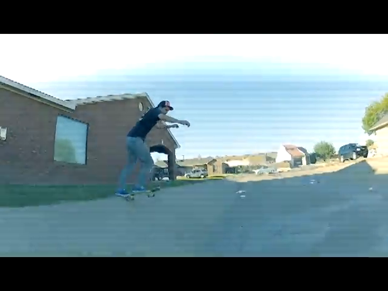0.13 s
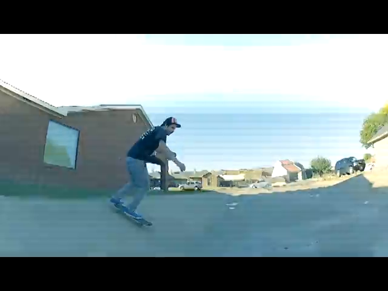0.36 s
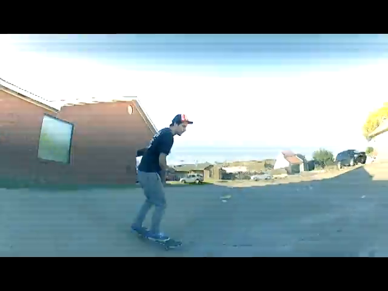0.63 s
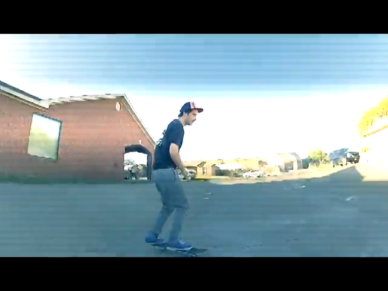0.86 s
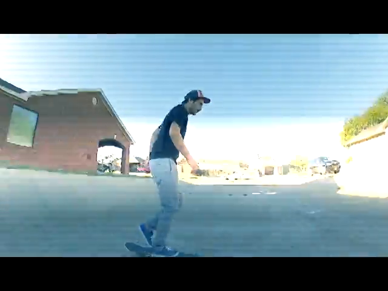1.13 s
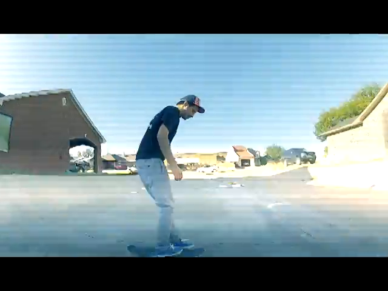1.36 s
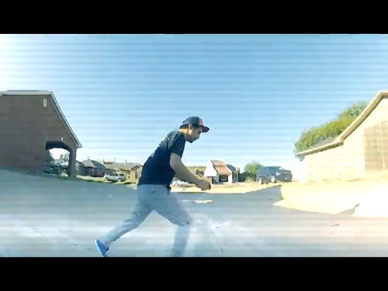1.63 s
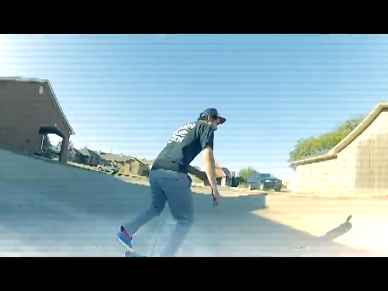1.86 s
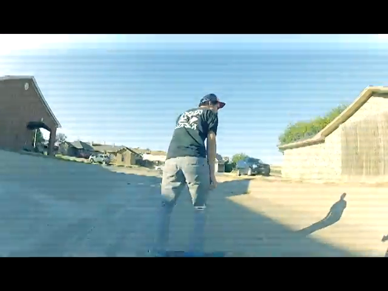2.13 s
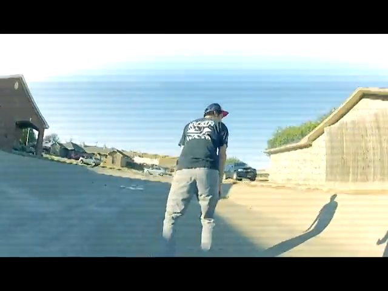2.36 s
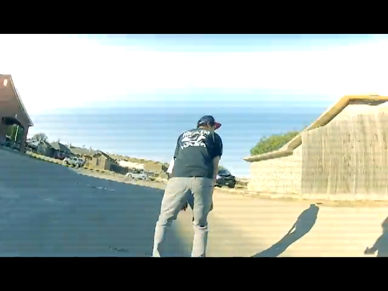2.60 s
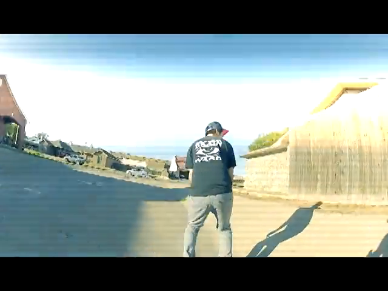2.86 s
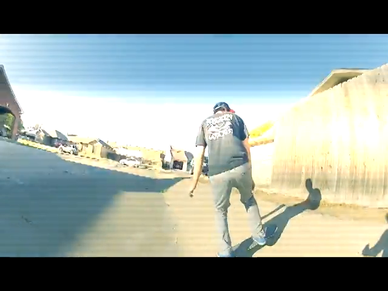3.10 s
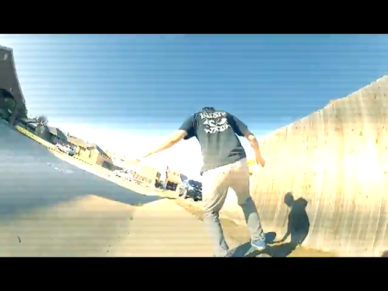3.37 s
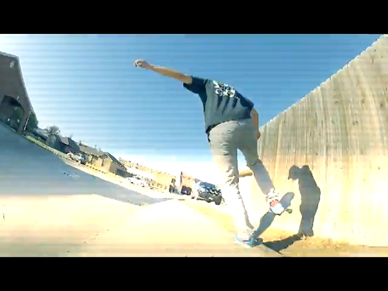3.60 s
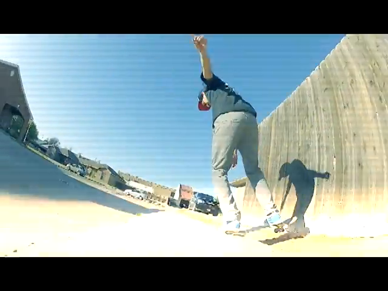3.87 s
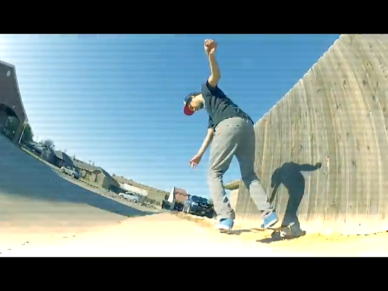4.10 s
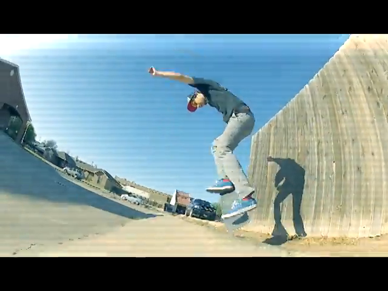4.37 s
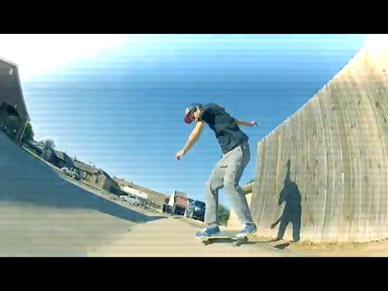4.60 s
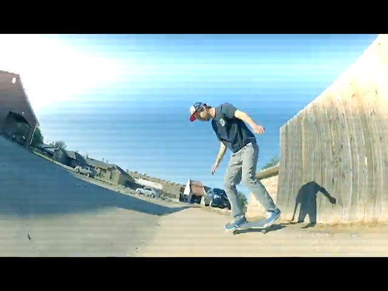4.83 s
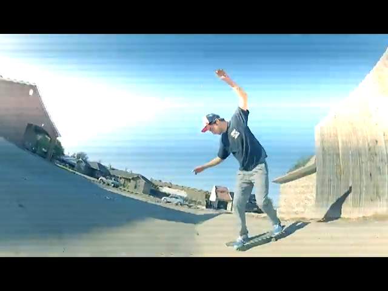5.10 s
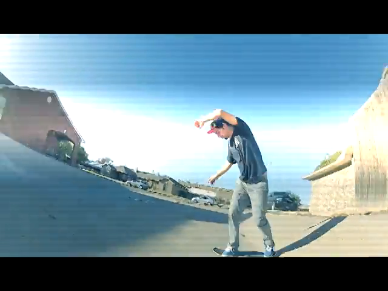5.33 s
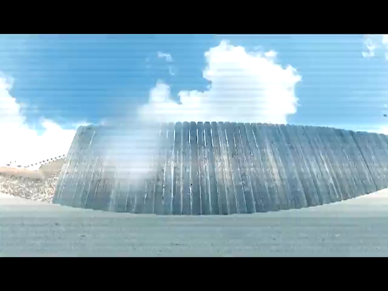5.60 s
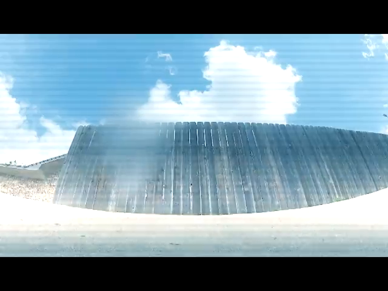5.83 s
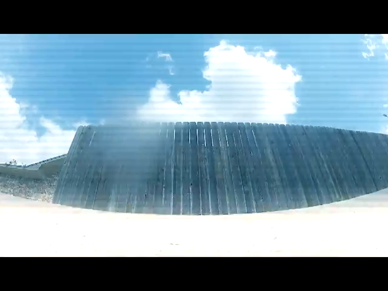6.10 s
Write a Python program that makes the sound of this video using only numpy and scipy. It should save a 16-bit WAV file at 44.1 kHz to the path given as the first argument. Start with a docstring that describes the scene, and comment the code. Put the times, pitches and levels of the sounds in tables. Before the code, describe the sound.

Gritty skateboard rolling heard close from a following board, broken by wooden knocks, scrapes and slams, ending in near quiet.

```python
"""A skateboard on rough concrete, heard from a second board that follows: it pops, scrapes and lands. Stones
shake the ground, deck, wheels and grit, each a bank of resonances driven by random bumps. Blows, ticks, tail
scrapes and a ringing truck are shaped noise or bumps; landings push the microphone. From 5.645 s the bass thins
to a rising drone, with faint narrow bands above it. The sound is held in 12 kHz steps, which mirrors it around
6 and 12 kHz, and the hardest landing clips."""
import sys
import numpy as np
from scipy import signal
from scipy.io import wavfile
from scipy.ndimage import uniform_filter1d

SR = 44100
rng = np.random.default_rng(int(sys.argv[2]) if len(sys.argv) > 2 else 0)


def boost(x):
    """Linear amplitude factor 10**(x/20) for a level x in decibels (scalar or array-like)."""
    u = np.asarray(x, float) / 20
    return 10 ** u


def generate_wav(sig):
    """Save sig (samples, or channels by samples) to the path in sys.argv[1] as 16-bit PCM at SR."""
    pcm = np.round(np.clip(np.atleast_2d(sig).T, -1, 1) * 32767).astype(np.int16)
    wavfile.write(sys.argv[1], SR, pcm)


N = 274213  # samples, 6.2 s
DRONE_FROM_S = 5.645  # the drone and thin bands begin


def unit(x):
    """Scale to rms 1."""
    return x / np.sqrt(np.mean(x ** 2))


def ring(x, modes):
    """Sum of steep resonances, each filtered twice, neighbours in opposite phase."""
    out = 0
    for k, (hz, width, db) in enumerate(modes):
        b, a = signal.iirpeak(hz, hz / width, SR)
        once = signal.lfilter(b, a, x)
        out = out + (-1) ** k * boost(db) * signal.lfilter(b, a, once)
    return out


def walk(rate):
    """Random levels held 1 / rate s and slewed twice; spread near 1, extremes rounded off."""
    hold = int(SR / rate)
    steps = np.repeat(rng.standard_normal(N // hold + 1), hold)
    slewed = uniform_filter1d(uniform_filter1d(steps, hold), hold)[:N]
    return 2 * np.tanh(0.65 * slewed)


def stones(rate, spread_db):
    """Random bumps under a wheel, most small, a few large; the wheel cannot climb the largest."""
    met = rng.random(N) < rate / SR
    size = np.minimum(rng.exponential(size=N), 4.0)
    sign = rng.choice([-1., 1.], N)
    return unit(met * sign * boost(spread_db * size))


def sweep(x, modes, centre_hz, db_per_octave, flicker_db):
    """Resonances lean towards a centre, fixed or moving, or away from it if the slope is negative.
    Each flickers alone; total power is evened out."""
    gains = []
    for hz, _, _ in modes:
        lean_db = db_per_octave * np.abs(np.log2(hz / centre_hz))
        gains.append(boost(flicker_db * walk(12) - lean_db))
    gains = np.array(gains)
    parts = np.array([(-1) ** k * ring(x, [mode]) for k, mode in enumerate(modes)])
    power = np.mean(parts ** 2, axis=1, keepdims=True)
    return np.sum(gains * parts, axis=0) / np.sqrt(np.sum(gains ** 2 * power, axis=0))


def add(out, s, db, modes, contact, rise, fall):
    """A rattle of contacts that swells and dies, scaled by its loudest 6 ms."""
    t = np.arange(len(contact)) / SR
    swell = np.sin(np.pi / 2 * np.minimum(t / rise, 1)) ** 2
    decay = np.exp(-(t - rise).clip(0) / fall)
    part = ring(contact * swell * decay, modes)
    loudest = np.sqrt(uniform_filter1d(part ** 2, size=264).max())
    start = int(s * SR)
    out[start:start + len(t)] += boost(db) * part / loudest


# stretches of concrete under the wheels: from t/s, grit against wheels level/dB,
# wheels peak f/Hz, narrowing/(dB/octave), rider's deck peak f/Hz
GROUND_STRETCHES = [(0, -8, 1090, 30, 230), (.33, -24, 1117, 31, 308), (.635, -4.5, 1380, 10, 294),
                    (1.17, -2, 1500, 4.5, 260), (2.85, -6, 1300, 5.5, 355), (3.4, -5.5, 1250, 16, 274),
                    (3.51, -15, 1930, 11, 286), (3.66, -10, 1250, 9.5, 270), (3.74, -10, 1250, 10.5, 303),
                    (4.3, -10, 1300, 9, 314), (4.4, -16, 1620, 7, 420), (4.62, -3.5, 1410, 8, 230),
                    (4.85, -11.5, 1400, 6, 310), (5.25, -9, 1430, 5.5, 315), (5.643, -20, 1300, 3, 300),
                    (5.72, -8.5, 1470, 2, 220), (6.18, -25, 1050, 10, 240)]


def surface(t):
    """The columns of the ground that is under the wheels at time t."""
    s, *columns = np.array(GROUND_STRETCHES).T
    at = np.maximum(np.searchsorted(s, t) - 1, 0)
    return [c[at] for c in columns]


# resonances of ground, deck, wheels and grit, and of the later drone: # f/Hz, width of one of the two filter
# passes/Hz, relative level/dB
GROUND_MODES = [(35.4, 54, -12), (60.7, 67, -7.5), (105.5, 75, -3), (171.6, 94, -4)]
DECK_MODES = [(218.3, 73.5, 0), (270.5, 78, -3.5), (341.4, 95, -3.5), (427.2, 97.4, -5), (576, 299, -8),
              (661, 260, -5.5)]
WHEEL_MODES = [(933, 923, -1), (1250, 480, 1), (1654, 910, -1.5), (2313, 450, -2.5), (2590, 1530, -7.5)]
GRIT_MODES = [(2445, 730, -9.5), (3085, 750, -3), (4150, 1950, -4.5), (5160, 3640, -7)]
DRONE_MODES = [(60, 54, -36), (133, 19, 4.5), (189, 29, -10)]
# the board that carries the microphone: t/s, load on the wheels level/dB
FOLLOWER_LOAD = [(0, -43.5), (.3, -49.5), (.335, -26), (.39, -38), (.475, -32), (.62, -39), (.645, -21),
                 (.7, -24), (.89, -19), (.96, -42), (1.03, -27.5), (1.08, -21), (1.17, -17), (1.37, -8.5),
                 (1.41, -14.5), (1.455, -12.5), (1.49, -26), (1.52, -10.5), (1.6, -19.5), (1.635, -26),
                 (1.665, -9.5), (1.72, -17), (1.77, -19), (1.8, -15.5), (2.085, -14), (2.115, -15.5),
                 (2.15, -13.5), (2.38, -17), (2.48, -14), (2.645, -10), (2.67, -21), (2.71, -11),
                 (2.92, -17.5), (3.02, -16.5), (3.08, -21), (3.44, -18), (3.52, -26.5), (3.58, -21),
                 (3.68, -21.5), (3.73, -25), (3.745, -56), (3.78, -44), (3.9, -45.5), (4.1, -42.5),
                 (4.28, -49.5), (4.32, -38), (4.5, -61), (4.72, -35), (4.95, -39), (5.25, -35.5),
                 (5.45, -36), (5.64, -43)]
# the rider's board heard from there: t/s, weight on the deck level/dB, grind of the wheels level/dB
RIDER_ROLL = [(0, -55, -60.5), (.055, -68, -65.5), (.13, -48, -64), (.24, -44, -64), (.29, -52, -65),
              (.325, -48, -62), (0.333, -18, -28), (.385, -28, -42.5), (.475, -35.5, -45),
              (.525, -31.5, -45.5), (.63, -25.5, -37.5), (.696, -16, -29), (.8, -39, -30.5),
              (.9, -30.5, -33), (1.02, -35, -34), (1.16, -45, -34.5), (1.18, -17, -35), (1.37, -22, -34),
              (1.47, -35, -32), (1.53, -20.5, -28), (1.59, -17, -31.5), (1.63, -29, -28),
              (1.72, -23.5, -35.5), (1.97, -17, -30.5), (2.2, -36, -33), (2.4, -18.5, -34.5),
              (2.63, -16.5, -33.5), (2.87, -31, -33), (3.08, -18.5, -27.5), (3.2, -23, -31),
              (3.36, -25.5, -33), (3.438, -29, -27), (3.451, -34, -39), (3.52, -22, -29),
              (3.58, -39, -31.5), (3.68, -37, -32), (3.735, -38, -41.5), (3.772, -33.5, -39),
              (3.83, -41.5, -42), (4.04, -47, -53.5), (4.23, -48.5, -51.5), (4.31, -42, -39.5),
              (4.39, -34.5, -38), (4.46, -42, -42.5), (4.59, -41, -34.5), (4.655, -36.5, -42),
              (4.72, -39.5, -53), (4.85, -40, -41), (4.91, -35.5, -31), (5.03, -26, -26.5),
              (5.08, -32, -30), (5.25, -28, -37), (5.356, -24, -30), (5.454, -18, -28), (5.51, -28, -31),
              (5.59, -27, -33.5), (5.64, -36.5, -38), (5.652, -49, -46), (5.75, -63, -56.5),
              (5.95, -45, -52.5), (6.056, -44, -47.5), (6.14, -39, -46), (6.189, -37, -42.5),
              (6.218, -41, -27)]
FOLLOWER_DECK_DB, RIDER_GROUND_DB = -5, -10.5  # how much of each board reaches the other part
FOLLOWER_DECK_HZ = 220
WHEELS_WANDER = .22  # octaves, where the narrowing is 9 dB/octave
DRONE_DB, DRONE_SWELL_DB_PER_S = -52, 39


def rolling():
    """The same stones shake ground and deck; patches of rougher concrete make all parts swell together."""
    t = np.arange(N) / SR
    load = boost(np.interp(t, *np.array(FOLLOWER_LOAD).T)) ** 2
    s, weight_db, grind_db = np.array(RIDER_ROLL).T
    weight = boost(np.interp(t, s, weight_db)) ** 2
    wheels_db = np.interp(t, s, grind_db)
    share_db, wheels_hz, lean_db, rider_hz = (uniform_filter1d(c, size=250) for c in surface(t))

    # both boards feed ground and deck; the stronger one pulls the deck's peak towards its own
    carried = load * boost(FOLLOWER_DECK_DB) ** 2
    ground_db = 10 * np.log10(load + weight * boost(RIDER_GROUND_DB) ** 2)
    deck_db = 10 * np.log10(carried + weight)
    deck_hz = (carried * FOLLOWER_DECK_HZ + weight * rider_hz) / (carried + weight)
    grit_db = wheels_db + share_db
    wheels_hz = wheels_hz * 2 ** (WHEELS_WANDER * (9 / lean_db) ** 2 * walk(12))

    patch = walk(20) + 0.48 * walk(45) + .5 * walk(120)
    coarse = stones(900, 2.28)
    ground = unit(ring(coarse + 0.81 * rng.standard_normal(N), GROUND_MODES))
    # from here a narrow, swelling drone takes the place of the rumble
    drone = unit(ring(rng.standard_normal(N), DRONE_MODES))
    drone_db = DRONE_DB + DRONE_SWELL_DB_PER_S * (t - DRONE_FROM_S)
    ground = np.where(t < DRONE_FROM_S, ground, drone)
    ground_db = np.where(t < DRONE_FROM_S, ground_db, drone_db)

    deck_drive = coarse + 0.68 * rng.standard_normal(N)
    deck = sweep(deck_drive, DECK_MODES, deck_hz, db_per_octave=7.0, flicker_db=2.0)
    # soft ground wakes only the modes close to the peak
    wheel_drive = stones(4000, 3.04) + 0.39 * coarse
    wheels = sweep(wheel_drive, WHEEL_MODES, wheels_hz, db_per_octave=lean_db, flicker_db=-1.0)
    # the grit leans away from its fixed centre
    grit = sweep(stones(3500, 2.45), GRIT_MODES, 3120.0, db_per_octave=-3.0, flicker_db=3.0)

    ground = boost(ground_db + 1.8 * patch + 1.5 * walk(13)) * ground
    deck = boost(deck_db + 1.5 * patch + 0.14 * walk(13)) * deck
    wheels = boost(wheels_db + 0.49 * patch + 1.0 * walk(13)) * wheels
    grit = boost(grit_db + 0.9 * patch + 0.21 * walk(22)) * grit
    return ground + deck + wheels + grit


# air resonances at the microphone: f/Hz, width of one of the two filter passes/Hz, relative level/dB
WIND_MODES = [(35, 24, -11), (72, 41, -1)]
WIND_DB, CALM_WIND_DB = -43, -28  # mean level, and its change from 5.645 s


def wind():
    """Air passing the microphone: a low flutter of resonant noise, weaker from 5.645 s."""
    shelter_db = CALM_WIND_DB * (np.arange(N) / SR > DRONE_FROM_S)
    flutter = boost(WIND_DB + shelter_db + 5.5 * walk(6.4))
    return flutter * unit(ring(rng.standard_normal(N), WIND_MODES))


# deck resonances under a blow: f/Hz, width of one of the two filter passes/Hz, relative level/dB
KNOCK_MODES = [(235, 293, 2), (487, 257, -1), (726, 575, -3.5)]
# blows on the boards: t/s, deck level/dB, hard parts level/dB, rattle length scale t/s
BLOW_EVENTS = [(.14, -46, -51, .014), (0.168, -38, -49, .014), (0.23, -52, -61, .006),
               (0.33, -14, -36, .0042), (.335, -10, -46, 0.0075), (.361, -18.5, -29, 0.0043),
               (.392, -23, -47, 0.007), (0.49, -32, -45, .008), (0.536, -32, -50, .006),
               (0.6327, -29, -20, 0.00079), (0.683, -16, -23, .0049), (0.765, -22, -17, 0.0053),
               (.923, -32.5, -30, 0.0066), (1.024, -21, -27, 0.0097), (1.164, -16.5, -25, 0.0057),
               (1.619, -22, -27.5, .01), (1.983, -16, -22, 0.0094), (2.588, -23, -25, 0.0024),
               (3, -16, -26, 0.008), (3.263, -12, -38, 0.0049), (3.332, -25, -30, .004),
               (3.369, -19.5, -25, 0.0093), (3.414, -18, -26.5, 0.0078), (3.564, -27, -22.5, 0.026),
               (3.609, -34, -23.5, 0.0024), (3.644, -24, -12, 0.0071), (3.703, -26, -29.5, 0.018),
               (3.831, -27, -33.5, 0.0087), (4.205, -49, -46, 0.0069), (4.33, -27, -28, 0.036),
               (4.36, -22, -25, 0.019), (4.509, -32.5, -29, 0.0081), (4.555, -46, -32.5, 0.005),
               (4.582, -29, -38, .004), (4.595, -8, -12, 0.0064), (4.6945, -21, -26.5, 0.003),
               (4.701, -10, -12.5, 0.0022), (4.902, -31, -30.5, .0077), (4.992, -23, -26.5, 0.0059),
               (5.024, -18, -33, 0.0064), (5.078, -30, -28, 0.015), (5.136, -44, -22.5, 0.0078),
               (5.198, -49, -34, .0021), (5.262, -24, -35.5, 0.0058), (5.457, -38, -36, .0046),
               (5.996, -32.5, -50, 0.017), (6.196, -32, -53, .0057)]
KNOCK_BUILDUP_S = 0.00204
RISE_S, RISE_SHARE = .0018, 0.24  # a blow swells this long, a short one for this share of its length
BLOW_GRIT_DB, BLOW_SURFACE_SHARE = -2, 0.67  # grit against hard parts; how far the ground changes it
BLOW_LEAN_SHARE, KNOCK_LEAN_DB_PER_OCTAVE = 0.87, 6
SOFT_BLOW_DB, SOFT_DULLING = -33, 1.1  # below this level a blow loses grit, dB per dB
SOFT_TOP_HZ = 1700  # a soft blow wakes no wheel modes from here up


def blows():
    """Each blow rattles deck, wheels and grit; high parts are over sooner."""
    out = np.zeros(N + SR)
    contacts = rng.standard_normal((len(BLOW_EVENTS), 3, SR // 8))
    for (s, deck_db, hard_db, length), (low, mid, high) in zip(BLOW_EVENTS, contacts):
        rise = min(RISE_S, RISE_SHARE * length)
        share_db, peak_hz, lean_db, deck_hz = surface(s)
        softness_db = SOFT_DULLING * min(hard_db - SOFT_BLOW_DB, 0)
        grit_db = hard_db + BLOW_GRIT_DB + BLOW_SURFACE_SHARE * share_db + softness_db
        knock = [(hz, width, db - KNOCK_LEAN_DB_PER_OCTAVE * abs(np.log2(hz / deck_hz)))
                 for hz, width, db in KNOCK_MODES]
        # soft ground dulls the modes above its peak
        lean = BLOW_LEAN_SHARE * (lean_db - 10)
        wheels = [(hz, width, db - lean * max(np.log2(hz / peak_hz), 0))
                  for hz, width, db in WHEEL_MODES]
        if hard_db < SOFT_BLOW_DB:
            wheels = [mode for mode in wheels if mode[0] < SOFT_TOP_HZ]
        # the deck's resonances build up slowly, so they start earlier to peak with the hard parts
        add(out, s - KNOCK_BUILDUP_S, deck_db, knock, low, rise, 1.18 * length)
        add(out, s, hard_db, wheels, mid, rise, 0.94 * length)
        add(out, s, grit_db, GRIT_MODES, high, rise, 0.74 * length)
    return out[:N]


# landings felt through the microphone's board: t/s, level/dB, push and rebound length t/s
LANDINGS = [(0.6323, 5.5, 0.0048), (3.26, -15, 0.0053), (4.703, -8.5, 0.0037)]


def thumps():
    """Each landing is one push and its rebound, a single bent sine cycle."""
    out, t = np.zeros(N), np.arange(N) / SR
    for s, db, length in LANDINGS:
        u = np.clip((t - s) / length, 0, 1)
        out += boost(db) * np.sin(2 * np.pi * u ** 0.72) * np.sin(np.pi * u) ** 1.25
    return out


# bright ticks of loose hardware: t/s, level/dB, f/Hz, width of one of the two filter passes/Hz
HARDWARE_TICKS = [(0.6323, -30, 3300, 3000), (.958, -33.5, 3000, 900), (1.492, -36, 4150, 1500),
                  (2.094, -26.5, 3120, 600), (3.261, -15.5, 3240, 2180), (3.398, -32, 4400, 1200),
                  (3.416, -31, 4160, 1500), (4.116, -49, 4700, 1500), (4.211, -50, 4500, 2000),
                  (4.606, -24.5, 3550, 1500), (4.631, -37, 3500, 500), (4.665, -45, 3500, 400),
                  (4.725, -40.5, 3520, 450), (4.797, -39, 4300, 500), (4.842, -39, 4440, 2000),
                  (5.084, -29, 3300, 350), (5.139, -29.5, 4700, 500)]


def ticks():
    """Short bright clicks of loose hardware, one resonance each, without any deck."""
    out = np.zeros(N + SR)
    contacts = rng.standard_normal((len(HARDWARE_TICKS), SR // 8))
    for (s, db, hz, width), contact in zip(HARDWARE_TICKS, contacts):
        add(out, s, db, [(hz, width, 0)], contact, rise=.0012, fall=0.0018)
    return out[:N]


# the tail dragging: t/s, length t/s, level/dB, f/Hz
TAIL_SCRAPES = [(3.514, 0.14, -30, 2130), (4.417, 0.082, -41.5, 2250), (4.825, 0.079, -42.5, 1055)]


def scrapes():
    """The wooden tail sticks and slips over the concrete and rasps in one narrow band."""
    out, t = np.zeros(N), np.arange(N) / SR
    slips = stones(1700, 4.5) * boost(3.1 * walk(60))
    for s, length, db, hz in TAIL_SCRAPES:
        swell = np.sin(np.pi * np.clip((t - s) / length, 0, 1))
        out += boost(db) * swell * unit(ring(slips, [(hz, 450, 0)]))
    return out


# a truck left ringing: start t/s, level/dB
TRUCK_START = (5.625, -30)
# its metal modes: f/Hz, relative level/dB, time to fall 60 dB t/s
TRUCK_MODES = [(944, -2, 0.25), (1250, -5, 0.5), (1340, -6, .3), (2250, -7, 0.17)]


def truck():
    """Loose metal modes, shaken as they die away: narrow noise bands with their own decays."""
    start_s, ring_db = TRUCK_START
    t = np.arange(N) / SR - start_s
    swell = np.clip(t / 0.024, 0, 1)
    out = np.zeros(N)
    for hz, db, t60 in TRUCK_MODES:
        decay = boost(ring_db + db - 60 * t.clip(0) / t60)
        out += decay * unit(ring(rng.standard_normal(N), [(hz, 90, 0)]))
    return swell * out


# thin bands from 5.645 s: f/Hz, width of one of the two filter passes/Hz, relative level/dB
CALM_MODES = [(1785, 130, 1), (2340, 110, 1), (2640, 200, -3), (3050, 81, -4)]
CALM_DB, CALM_SWELL_DB_PER_S, CALM_FLICKER_DB = -59, 19, 1.5


def calm():
    """Faint narrow bands, driven by random bumps, that flicker and rise along with the drone."""
    t = np.arange(N) / SR - DRONE_FROM_S
    level = boost(CALM_DB + CALM_SWELL_DB_PER_S * t.clip(0) + CALM_FLICKER_DB * walk(15))
    return (t > 0) * level * unit(ring(stones(3000, 1.8), CALM_MODES))


def scene():
    """One microphone on the following board, the same on both channels."""
    boards = rolling() + blows() + thumps() + ticks() + scrapes() + truck()
    return np.tile(boards + wind() + calm(), (2, 1))


def low_pass(x):
    """Removes everything above the highest recorded frequency."""
    return signal.sosfilt(signal.butter(12, 16460, fs=SR, output="sos"), x)


def record(dry):
    """Keep 12000 clipped values a second, hold each for four samples, convert back and cut the top."""
    hold_hz, held_hz, top_hz = 12000, 48000, 15270
    soft = signal.sosfilt(signal.butter(8, 5600, fs=SR, output="sos"), dry)
    slow = np.clip(signal.resample_poly(soft, hold_hz, SR, axis=1), -1, 1)
    steps = np.repeat(slow, held_hz // hold_hz, axis=1)
    held = signal.resample_poly(steps, SR, held_hz, axis=1)[:, :N]
    cut = signal.sosfiltfilt(signal.ellip(8, .1, 12, top_hz, fs=SR, output="sos"), held)
    mix = np.clip(cut, -1, 1)
    return low_pass(mix)


dry = scene()
out = record(dry)
generate_wav(out)
```